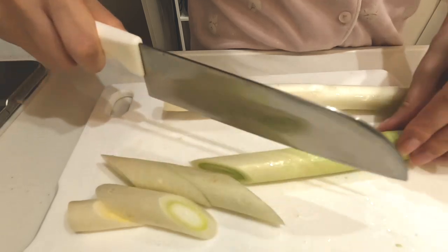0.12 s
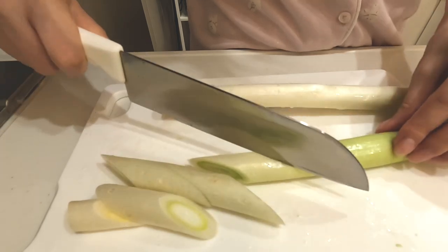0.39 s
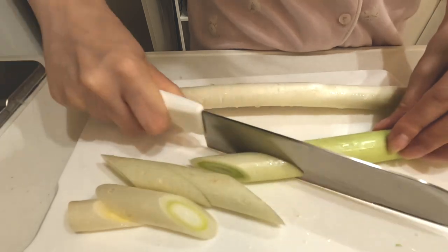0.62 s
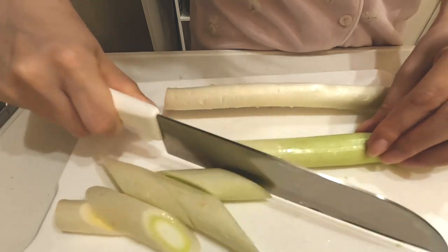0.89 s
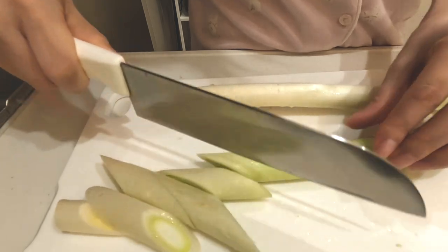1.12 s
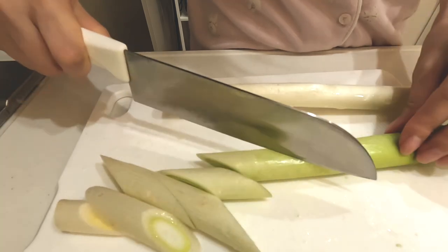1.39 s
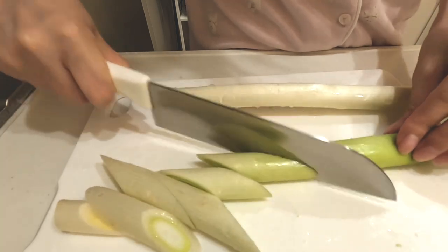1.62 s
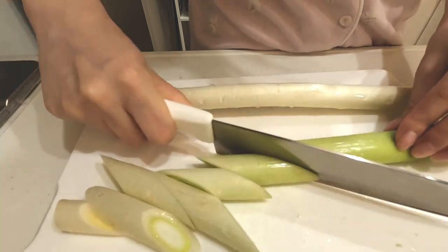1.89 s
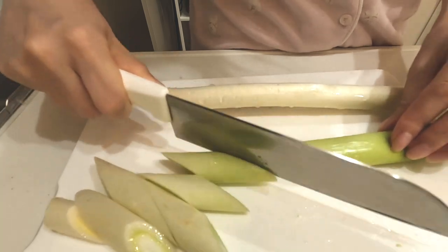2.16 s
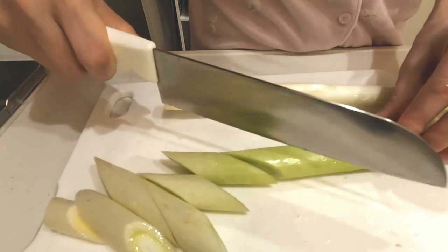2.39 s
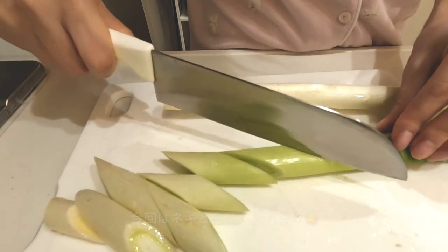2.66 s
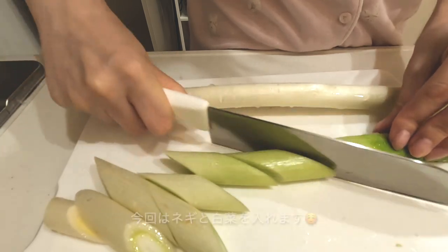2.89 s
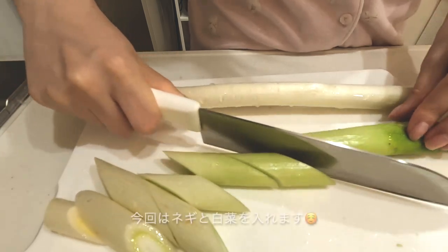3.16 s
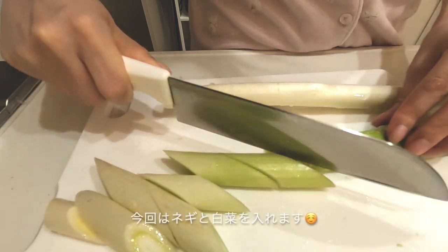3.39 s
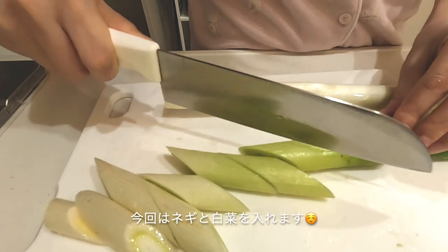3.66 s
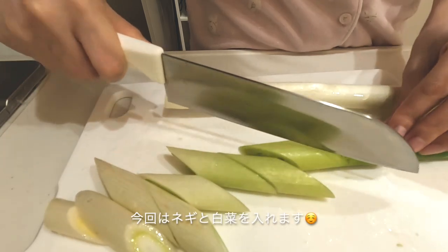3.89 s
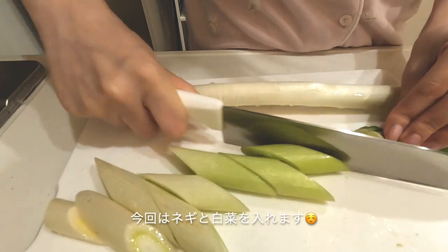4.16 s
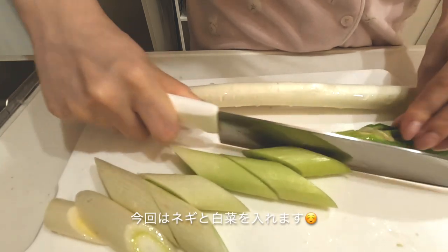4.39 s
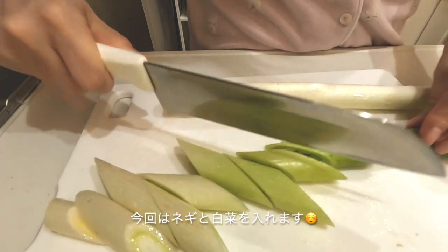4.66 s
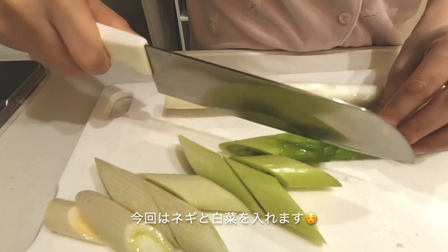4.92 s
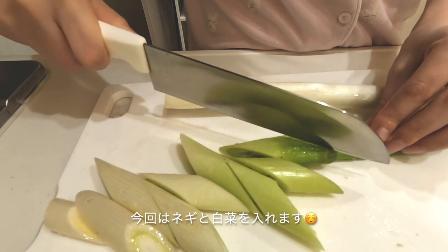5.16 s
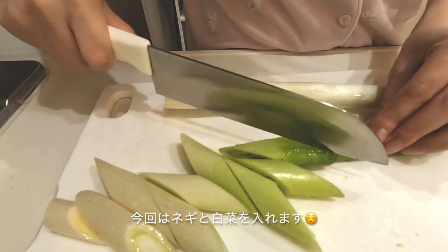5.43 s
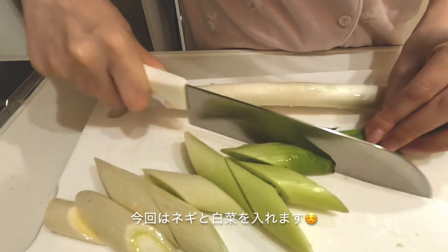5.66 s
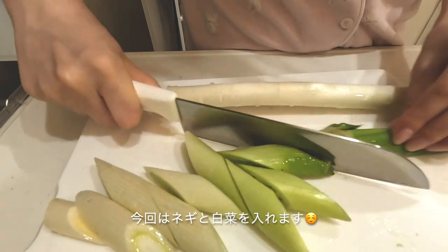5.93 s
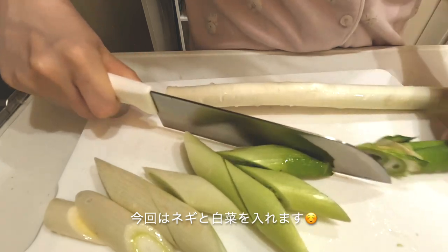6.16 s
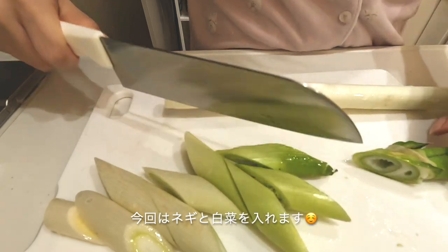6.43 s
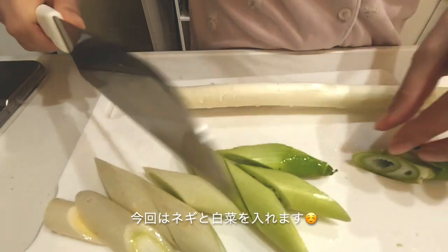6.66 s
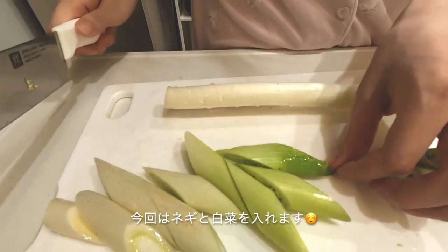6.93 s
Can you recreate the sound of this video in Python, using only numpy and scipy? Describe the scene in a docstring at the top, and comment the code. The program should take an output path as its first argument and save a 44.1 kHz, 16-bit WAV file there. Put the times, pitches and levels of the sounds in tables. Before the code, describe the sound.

In a quiet, lightly reverberant kitchen with faint hum and rumble, a close stereo microphone hears a blade tear juicily through stalks about once a second, five times, each cut landing with a dull plastic knock. Between cuts come edge scrapes, soft rustles of fingers and stalk, low thumps, and brighter crockery clinks from further off, the strongest just before the last cut. Afterwards only small drags, slides and clinks remain, fading away.

```python
"""In a hard kitchen a refrigerator hums (a sine) over faint hiss and rumble (coloured noise). Stalk and fingers slide
(noise and tiny rings), and soft thumps come through the counter (low fading sines). A knife then makes five cuts
through leek stalks close by: the fibres crunch and snap (noise and short rings in jerks), the blade knocks a plastic
board (ringing modes) and is dragged back over it. Between and after the cuts, crockery clinks further off (coloured
reverberation). After the last cut come more slides, drags and clinks, each fading away."""
import sys
import numpy as np
from scipy import signal
from scipy.fft import rfft, irfft, next_fast_len
from scipy.io import wavfile
from scipy.ndimage import uniform_filter1d, map_coordinates

SR = 44100
rng = np.random.default_rng(int(sys.argv[2]) if len(sys.argv) > 2 else 0)


def unload_audio(sound):
    """Save the sound as a 16-bit wav file, at the path given as the first command line argument."""
    columns = np.transpose(np.atleast_2d(sound))
    # keep every value between -1 and 1, then stretch to whole-number steps
    steps = np.round(np.clip(columns, -1, 1) * 32767)
    wavfile.write(sys.argv[1], SR, steps.astype(np.int16))


def ratio_of_db(decibels):
    """Turn decibels (scalar or array-like) into linear amplitude factors; 0 dB maps to 1."""
    return 10 ** (np.asarray(decibels, float) / 20)


N = 310905  # length [samples]

# steady hum of the refrigerator: (frequency [Hz], average level [dB])
HUM = (59.2, -53.5)
# colour of the room hiss: (frequency [Hz], relative level [dB per Hz])
HISS = [(40, -19), (70, 1), (120, -3), (200, -7), (235, -4), (300, -15), (500, -15), (800, -30),
        (1400, -23.5), (3500, -37), (5200, -32.5), (8000, -38.5), (12500, -39.5), (14000, -67)]
HISS_DB = -59  # average level
# low rumble that comes and goes: (time [s], average level [dB])
RUMBLE = [(0.0, -60), (0.08, -52), (2.08, -48), (2.32, -65), (2.73, -51), (2.96, -61.5), (3.04, -47),
          (3.45, -51.5), (3.49, -56.5), (4.18, -43), (4.85, -55.5), (5.32, -47.5), (5.34, -56.5),
          (6.11, -58), (6.38, -44.5), (6.64, -58), (7.01, -57.5), (7.05, -81)]
# colour of the rumble: (frequency [Hz], relative level [dB per Hz])
RUMBLE_COLOUR = [(6, -24.0), (16, 6.0), (36, 3.0), (52, -16.5), (80, -59.5)]
# how long each pitch lingers in the kitchen: (frequency [Hz], time to fall by 60 dB [s])
KITCHEN = [(150, 0.84), (800, 0.41), (2500, 0.38), (6000, 0.39), (12000, 0.31)]
# likeness of left and right: (frequency [Hz], correlation [0 to 1])
ALIKE = [(30, 0.96), (70, 0.87), (125, 0.79), (300, 0.87), (1000, 0.69), (4000, 0.69), (9000, 0.83),
         (12500, 0.45)]

# stalk and fingers slide:
# (peak time [s], rise [s], fall [s], level [dB], rustle centre [Hz], left over right [dB])
SLIDES = [(0.11, 0.074, 0.12, -57.5, 3680, -3.5), (0.78, .08, 0.078, -68, 4140, 2),
          (1.071, 0.083, 0.096, -53.5, 4800, 2), (2.259, 0.12, 0.11, -57, 5100, -3),
          (2.64, 0.061, 0.089, -58.5, 5500, 5.5), (3.19, 0.24, 0.14, -53.5, 4500, -5),
          (3.461, .06, 0.13, -52, 3880, -2), (3.551, 0.068, 0.024, -49.5, 3590, -4),
          (3.7, 0.23, 0.45, -69.5, 3450, 11), (4.37, .05, .06, -79.5, 4930, -10),
          (4.471, 0.065, .12, -49.5, 3550, -4), (4.83, 0.11, 0.096, -48.5, 3800, -3),
          (5.09, 0.11, 0.099, -53, 3630, 3.5), (5.9, .05, 0.078, -59, 3710, -1),
          (6.08, 0.068, 0.1, -53, 3840, 0), (6.2, .06, 0.21, -54, 4300, -5)]
# the edge drags over the board:
# (peak time [s], rise [s], fall [s], level [dB], scrape centre [Hz], relative singing of the steel [dB])
DRAGS = [(0.45, 0.037, 0.03, -46.5, 915, -23), (0.886, 0.046, .045, -34, 1296, 0),
         (2.057, 0.027, 0.053, -37, 1360, 0), (3.26, 0.13, 0.054, -48.5, 1190, -3.5),
         (4.471, 0.072, 0.1, -50.5, 2030, -6), (4.59, 0.12, 0.032, -41.5, 2340, -6),
         (5.973, 0.03, 0.13, -45.5, 1480, -10), (6.21, 0.061, 0.12, -51.5, 1480, -14),
         (6.36, 0.18, 0.058, -54.5, 1620, -16), (6.97, 0.024, 0.092, -58.5, 880, -20)]
# colours of the rustle and the scrape: (frequency [Hz], relative level [dB per Hz])
RUSTLE = [(1290, -32), (2200, -4.5), (3900, -3), (4650, -14.5), (5110, -0.5), (9000, -15), (11700, -56.5),
          (19800, -120)]
SCRAPE = [(210, -24), (350, 2.5), (530, -9.5), (817, 0), (1720, -1), (2270, 5), (3500, -10.5), (4550, -35),
          (7700, -120)]
# wet spray of the cells, also the hiss of rubbing: (frequency [Hz], relative level [dB per Hz])
FIZZ = [(4710, -7.5), (8000, -8), (9160, -11.5), (11200, -5), (12900, -14), (13700, -18), (15500, -56.5)]
# resonances of the steel blade: (frequency [Hz], width [Hz], relative level [dB])
BLADE = [(900, 110, -2), (1280, 75, -10), (2380, 110, 5), (3150, 78, -3), (3840, 100, -8), (4940, 48, 13),
         (5350, 40, 3), (6050, 45, -1), (7050, 50, -8), (10050, 76, -25)]
# mixing levels against the drag level; rustle and hiss also follow the singing, so dull drags have less
DRAG_RUSTLE_DB, DRAG_HISS_DB = -4.5, -11.5
DRAG_RUSTLE_HZ, DRAG_PAN_DB = 4800, -2.2  # centre of the rustle grains; left over right
SLIDE_SCRAPE_DB, SLIDE_HISS_DB, SLIDE_RING_DB = -7, -19.5, -11.5  # mixing levels against the slide level
SLIDE_SCRAPE_HZ = 1550  # centre of the scrape grains
SWELL_DB = 15  # a swell is this far below its peak after one rise or fall time

# soft thumps through the counter: (time [s], level [dB], pitch [Hz], time to fall by 60 dB [s])
THUMPS = [(0.129, -42, 131.4, 0.65), (1.424, -29.5, 113.2, 0.2), (2.049, -35.5, 178, 0.19),
          (2.597, -38.5, 80.6, 0.31), (3.051, -36.5, 76, 0.6), (3.256, -34, 227, 0.2),
          (3.811, -38, 76, 0.084), (4.021, -32.5, 91.8, 0.3), (4.142, -24.5, 186.7, 0.48),
          (4.329, -31, 100.7, 0.29), (5.186, -21, 94.8, 0.12), (5.221, -27.5, 108.6, 0.17),
          (5.247, -37, 83.3, 1), (5.329, -27.5, 77.2, 0.14), (5.478, -32, 90.7, 0.5),
          (5.953, -42.5, 218, 0.38), (6.297, -55, 71, 0.61), (6.962, -45.5, 251, 0.27)]

# how hard the blade tears through the stalk, one list a cut: (time [s], crunch level [dB])
CUTS = [
    [(0.45, -63.5), (0.484, -32.5), (0.494, -39), (0.504, -29), (0.562, -23), (0.598, -24), (0.604, -29),
     (0.74, -53.5), (0.78, -79)],
    [(1.565, -56), (1.591, -35.5), (1.619, -39), (1.629, -25), (1.637, -35), (1.717, -18.5), (1.843, -55.5),
     (1.869, -43.5), (1.95, -89.5)],
    [(2.75, -52.5), (2.764, -36.5), (2.838, -23), (2.858, -23), (2.884, -23), (2.9, -26.5), (2.964, -36),
     (2.968, -42.5), (2.992, -48)],
    [(3.97, -50.5), (4.002, -32.5), (4.02, -40.5), (4.03, -31.5), (4.158, -20.5), (4.208, -37),
     (4.218, -31), (4.236, -52.5), (4.268, -37)],
    [(5.6, -32), (5.624, -39), (5.642, -32.5), (5.652, -41.5), (5.666, -26), (5.72, -19.5), (5.73, -36),
     (5.814, -30.5), (5.9, -57.5)],
]
# picked snaps and ticks, most of them fibres breaking in the cuts: (time [s], level [dB], pitch [Hz])
SNAPS = [(0.4794, -28.5, 1890), (0.5043, -24, 4000), (0.5153, -23, 3550), (0.535, -16.5, 3170),
         (0.5526, -16.5, 4100), (0.565, -13.5, 1990), (0.6454, -20.5, 1840), (1.5842, -29, 3540),
         (1.5951, -22.5, 2700), (1.6094, -27.5, 2860), (1.6307, -20, 2830), (1.6531, -14.5, 2190),
         (1.6931, -25.5, 1800), (1.7172, -17.5, 1900), (1.743, -14, 1830), (1.7957, -19.5, 1990),
         (2.7663, -22, 3180), (2.7754, -18.5, 3630), (2.79, -27, 1660), (2.8194, -10.5, 3200),
         (2.8391, -12.5, 3300), (2.8672, -19, 2720), (2.882, -12.5, 3470), (2.9697, -16, 3330),
         (3.5485, -34, 1520), (3.9944, -27.5, 1750), (4.03, -20.5, 3800), (4.0468, -19.5, 3660),
         (4.0584, -15, 3770), (4.0983, -26, 3150), (4.1112, -15, 3940), (4.1402, -10.5, 3880),
         (4.153, -14.5, 1970), (4.2186, -15.5, 7500), (4.732, -44.5, 2960), (5.6334, -22.5, 2550),
         (5.6408, -15, 2950), (5.667, -13, 3640), (5.6834, -14.5, 3060), (5.7075, -15.5, 2830),
         (5.764, -25.5, 3740), (5.9234, -25.5, 3140), (5.9397, -25, 4000), (5.9603, -15.5, 2980)]
# the stalk met by each cut: (pitch of bursting cells before the edge lands [Hz], relative fizz level [dB])
STALKS = [(2950, -12.5), (2530, -14), (3090, -14.5), (3030, -15.5), (2660, -14.5)]
# colour of the crunch: (frequency [Hz], relative level [dB per Hz])
CRUNCH = [(290, -14.5), (500, -4.5), (1350, -1.5), (1910, 5), (2190, -10), (3810, 3.5), (7420, -6.5),
          (9000, -40.5), (11700, -55.5), (19800, -120)]
CRUSHED_PITCH = 0.76  # share of the cell pitch left once the edge has landed
FIZZ_GROWS = 0.79  # dB of fizz for each dB of crunch
SMALL_SNAP_DB, SNAP_SCATTER_DB = 4, 2.8  # chance snaps over the crunch level; left-right scatter of all snaps

# the edge lands on the board: (time [s], level [dB], extra for the low modes [dB],
# shaking of the first board mode [dB], shaking of the second board mode [dB])
KNOCKS = [(0.596, -12.5, 0, -31.5, -35), (1.75, -16, -2.5, -31, -31), (2.888, -13, 0, -36.5, -29.5),
          (4.18, -7.5, -6.5, -34, -34), (5.72, -10, -5, -35, -31.5)]
# resonances of the plastic board: (frequency [Hz], width [Hz], relative level [dB])
BOARD = [(228.9, 30.6, 4), (322.1, 21, -5), (401, 28, 10), (635, 34, -13), (842, 84, 1), (1150, 130, -7.5)]
# side from which stalk and board are heard: (frequency [Hz], left over right [dB])
FACING = [(60, 4), (150, -2.5), (380, -1.5), (950, -1), (2380, -3.5), (5980, -2), (15000, 2)]
# shaking around each landing: (peak after the landing [s], rise [s], fall [s])
FIRST_SHAKE, SECOND_SHAKE = (-0.028, 0.031, 0.11), (0.005, 0.053, 0.092)
COUNTER_SHAKE, COUNTER_DB = (-0.024, 0.056, 0.15), -41
# colour of the shaking counter: (frequency [Hz], relative level [dB per Hz])
COUNTER_COLOUR = [(35, -32.5), (65, 6.5), (160, 5.5), (230, -40.0)]

# far contacts: (time [s], level [dB], relative ringing [dB], left over right [dB], what is struck)
CLINKS = [(1.3169, -18, -9.5, 2.5, "plate"), (1.4101, -25.5, -6, 3, "plate"), (2.5794, -54, -3, 6, "spoon"),
          (3.004, -18, -3.5, 3.6, "lid"), (3.0234, -29, -13, -3, "lid"), (3.7789, -34, -9.5, 2.1, "plate"),
          (3.916, -23, -5.5, 3, "lid"), (4.2745, -19, -8, 3.5, "lid"), (5.172, -25.5, -10.2, 6, "tray"),
          (5.189, -24.5, -2, 1.5, "tray"), (5.3182, -15, 0, 3, "cup"), (5.462, -8.5, -10, 2.5, "bowl"),
          (6.133, -33.5, -5, 5, "lid"), (6.319, -35.5, -12.5, 5.5, "lid"),
          (6.5983, -22.5, 0.5, 2.5, "spoon"), (6.6187, -25, 2, 3, "spoon")]
# colour of the bare contact: (frequency [Hz], relative level [dB])
CLICK = [(200, -24.5), (900, -17.5), (3000, -18), (7000, -20.5), (9000, -31.5), (12500, -30.5),
         (15800, -47)]
# what each far thing rings with: (frequency [Hz], width before widening [Hz], relative level [dB])
PLATE = [(1560, 21, -5), (2190, 11, 3), (2830, 49, 2.5), (4550, 42, 1.5), (4700, 47, 3.5), (5005, 60, -3.5),
         (5500, 25, -1.5), (5830, 44, -9), (6560, 45, -3), (6490, 41, -6), (6900, 27, -22), (7340, 65, -5),
         (8650, 52, -31), (9300, 41, -18)]
BOWL = [(1360, 230, -2), (2010, 20, 5.5), (2774, 52, 9.5), (3870, 74, -7), (4730, 140, 2.5),
        (5470, 420, 1.5), (6570, 440, 2), (6860, 40, -29), (7780, 32, -2), (8300, 140, -21),
        (9570, 67, -12.5)]
CUP = [(1625, 8.1, -1.5), (3150, 57, -8), (3700, 60, 3.5), (3770, 83, 1), (4960, 36, -9.5),
       (5100, 44, -1.5), (6200, 170, -5), (6470, 26, -12.5), (6940, 60, -3.5), (7850, 39, -21),
       (9540, 47, -16), (10700, 35, -20)]
SPOON = [(945, 75, -4), (2300, 120, 1.5), (3030, 110, 2), (3240, 74, -0.5), (3770, 100, 4), (4680, 87, 5.5),
         (5340, 210, 6), (6820, 180, 2.5), (6940, 49, -1.5), (7850, 140, 0), (9240, 84, -10.5),
         (11570, 1900, -13.5)]
TRAY = [(1103, 110, 5), (1685, 55, 8), (1890, 22, 0), (2110, 42, 6), (2630, 42, -7), (4610, 44, -0.5),
        (4920, 140, -5), (5440, 49, -10.5)]
LID = [(2450, 110, -8.5), (2887, 36, 1), (3170, 55, -3.5), (3850, 170, -6.5), (4800, 97, 1.5),
       (5300, 260, 0.5), (5800, 30, -20.5), (5870, 320, -3.5), (6910, 120, -12.5), (7340, 25, -4),
       (8900, 15, -19.5), (9400, 57, -24.5)]


def unit(x):
    """Scales to rms 1."""
    return x / np.sqrt(np.mean(x ** 2) + 1e-20)


def along(points, hz):
    """Reads (frequency, value) points on a log frequency axis."""
    f, v = np.transpose(points)
    return np.interp(np.log(hz + 1), np.log(f + 1), v)


def curves(tables):
    """A gate that fades in and out at the ends of each table, then the columns per sample."""
    t = np.arange(N) / SR
    s, *cols = np.transpose(np.vstack(tables))
    gate = sum((t >= rows[0][0]) & (t <= rows[-1][0]) for rows in tables) > 0
    return [uniform_filter1d(gate * 1., size=600)] + [np.interp(t, s, c) for c in cols]


def wobble(rate):
    """A smooth random curve with rate knots a second."""
    knots = rng.standard_normal(int(N * rate / SR) + 4)
    return map_coordinates(knots, [np.arange(N) * rate / SR])


def filtered(x, response):
    """Applies a complex response of frequency to x."""
    n = x.shape[-1]
    m = next_fast_len(n + 8192)
    return irfft(rfft(x, m) * response(np.fft.rfftfreq(m, 1 / SR)), m)[..., :n]


def modes(table):
    """Response of a body that rings at several (frequency, width, level) resonances when struck."""
    def response(f):
        total = 0
        for k, (c, w, db) in enumerate(table):
            resonance = 1j * f * w / (c * c - f * f + 1j * f * w)
            total = total + (-1) ** k * ratio_of_db(db) * resonance  # signs alternate
        return total
    return response


def sides(db):
    """Left and right gains for a left-right level difference."""
    return ratio_of_db(np.array([db / 2, -db / 2]))


def pair(mid, side):
    """Left and right from two unrelated signals, as alike at each frequency as ALIKE says."""
    turn = lambda hz: np.arccos(np.clip(along(ALIKE, hz), -1, 1)) / 2
    shares = lambda hz: np.array([np.cos(turn(hz)), np.sin(turn(hz))])
    a, b = filtered(np.array([mid, side]), shares)
    return np.array([a + b, a - b])


def grit(spiky_db, lumpy_db, rate):
    """White grains of uneven size that come in lumps."""
    spikes = np.minimum(rng.exponential(size=N), 5)
    sizes = ratio_of_db(spiky_db * spikes + lumpy_db * wobble(rate))
    return unit(sizes) * rng.standard_normal((2, N))


def coloured(x, spectrum):
    """Stereo noise of rms 1 shaped by that spectrum."""
    return unit(filtered(pair(*x), lambda hz: ratio_of_db(along(spectrum, hz))))


def patchy(x, depth_db):
    """Random coloured patches, some hundred hertz wide and tens of milliseconds long."""
    z = signal.stft(x, nperseg=256)[2]
    field = uniform_filter1d(rng.standard_normal(z.shape[1:]), size=3, axis=0)
    field = uniform_filter1d(field, size=16, axis=1)
    return unit(signal.istft(z * ratio_of_db(depth_db * unit(field)), nperseg=256)[1][:, :N])


def grains(gate, centre_hz, spread, cycles, spiky_db, count):
    """Short damped rings at random moments, pitched around a moving centre; rms 1 while the gate is open."""
    draw = rng.random((count, 3))
    start = np.flatnonzero(gate > 0)[(draw[:, 0] * np.sum(gate > 0)).astype(int)]
    hz = centre_hz[start] * np.exp(spread * rng.standard_normal(count))
    turns = np.clip(hz, 500, 9000)[:, None] * np.arange(300) / SR
    sizes = ratio_of_db(-spiky_db * np.log(draw[:, 1:2] + 0.0076))
    rings = sizes * np.sin(2 * np.pi * turns) * np.exp(-turns / cycles)
    places = start[:, None] + np.arange(300)
    out = np.bincount(places.ravel(), rings.ravel(), N + 300)[:N]
    return out / np.std(out[gate > 0])


def swells(s, rise, fall, db, bend):
    """One level in dB per event and sample: up to a peak at s and down again."""
    column = lambda values: np.reshape(values, (-1, 1))
    lag = np.arange(N) / SR - column(s)
    span = np.abs(lag) / np.where(lag < 0, column(rise), column(fall)).clip(0.005)
    return column(db) - SWELL_DB * np.minimum(span, 9) ** bend


def tail(seconds):
    """A new stereo reverberation, energy 1 on the left; each frequency dies at its own speed."""
    hz, t, z = signal.stft(rng.standard_normal((2, int(seconds * SR))), SR, nperseg=256)
    fade = ratio_of_db(-60 * t / along(KITCHEN, hz)[:, None])
    out = pair(*signal.istft(z * fade, SR, nperseg=256)[1])
    return out / np.linalg.norm(out[0])


def add(track, s, sound):
    """Mixes a stereo sound in at time s."""
    part = track[:, round(s * SR):][:, :sound.shape[1]]
    part += sound[:, :part.shape[1]]


def room():
    """Steady room noise: gently wavering hiss, a slightly unsteady hum and a low rumble that comes and goes."""
    hz, db = HUM
    hum_level = np.sqrt(2) * ratio_of_db(db + 1.0 * wobble(2.6))  # root 2 turns rms into sine peak
    hum = hum_level * np.sin(2 * np.pi * hz * np.arange(N) / SR + 0.18 * wobble(4))
    hiss = ratio_of_db(HISS_DB + 0.73 * wobble(5.1)) * coloured(rng.standard_normal((2, N)), HISS)
    _, rumble_db = curves([RUMBLE])
    rumble = ratio_of_db(rumble_db + 2.5 * wobble(10)) * coloured(rng.standard_normal((2, N)), RUMBLE_COLOUR)
    return hum + hiss + rumble


def rubs():
    """Sliding makes rough noise and tiny rings pitched by the contact, and sets the steel singing."""
    *drag, drag_hz, sing_db = np.transpose(DRAGS)
    *slide, slide_hz, slide_pan_db = np.transpose(SLIDES)
    drags, slides = swells(*drag, bend=2.25), swells(*slide, bend=2.2)
    which_drag, which_slide = drags.argmax(axis=0), slides.argmax(axis=0)
    drag_db, slide_db = drags.max(axis=0), slides.max(axis=0)
    sing_now_db = sing_db[which_drag]

    # the louder of drag and slide sets pitch and side
    dragging, always = drag_db > slide_db, np.ones(N)
    high_hz = np.where(dragging, DRAG_RUSTLE_HZ, slide_hz[which_slide])
    low_hz = np.where(dragging, drag_hz[which_drag], SLIDE_SCRAPE_HZ)
    pan_db = uniform_filter1d(np.where(dragging, DRAG_PAN_DB, slide_pan_db[which_slide]), size=900)

    def mix(over_drag_db, over_slide_db):
        """Gain for drag and slide together, their powers added."""
        return np.hypot(ratio_of_db(drag_db + over_drag_db), ratio_of_db(slide_db + over_slide_db))

    rustle = ratio_of_db(-7) * coloured(patchy(grit(1.4, 1.3, rate=66), depth_db=3), RUSTLE)
    rustle += ratio_of_db(-7.5) * grains(always, high_hz, spread=0.14, cycles=4, spiky_db=5.0, count=13000)
    hiss = coloured(patchy(grit(1.2, 1.4, rate=160), depth_db=7.5), FIZZ)
    scrape = ratio_of_db(-6.5) * coloured(patchy(grit(0.76, 0.83, rate=46), depth_db=4.0), SCRAPE)
    scrape += ratio_of_db(-3.5) * grains(always, low_hz, spread=0.08, cycles=0.5, spiky_db=3.5, count=8000)
    push = pair(*grit(2.8, 0.94, rate=21))
    push /= np.std(filtered(push, modes(BLADE)))
    # levels come before the resonances, so the steel rings on after the contact
    ring = filtered(ratio_of_db(-2.5) * mix(sing_now_db, SLIDE_RING_DB) * push, modes(BLADE))

    out = mix(DRAG_RUSTLE_DB + 0.9 * sing_now_db, 0) * rustle
    out = out + mix(DRAG_HISS_DB + 0.6 * sing_now_db, SLIDE_HISS_DB) * hiss
    out = out + mix(0, SLIDE_SCRAPE_DB) * scrape
    return sides(pan_db) * (out + ring)


def thumps():
    """The counter gives low wavering rings with a soft start that fade steadily."""
    out, t = np.zeros((2, N)), np.arange(SR // 2) / SR
    for s, db, hz, t60 in THUMPS:
        shared_drift = np.cumsum(rng.normal(0, 0.056, len(t)))
        own_drift = np.cumsum(rng.normal(0, 0.008, (2, len(t))), axis=1)  # one for each ear
        fade = ratio_of_db(db - 1.0 - 60 * t / np.clip(t60, 0.03, 1))
        soft_start = 1 - np.exp(-t / 0.0041)
        add(out, s, np.sin(2 * np.pi * hz * t + shared_drift + own_drift) * fade * soft_start)
    return out


def jerks(gate, snap_size, chance_db, t60, base, count):
    """Envelope of a blade that sticks and slips: bursts at the snaps and at chance moments, over a base."""
    start = np.flatnonzero(gate > 0)[(rng.random(count) * np.sum(gate > 0)).astype(int)]
    kicks = np.bincount(start, ratio_of_db(chance_db + 2.5 * rng.standard_normal(count)), N)
    kicks[[round(row[0] * SR) for row in SNAPS]] += snap_size
    out = base + signal.fftconvolve(kicks, ratio_of_db(-60 * np.arange(2000) / SR / t60))[:N]
    return out / np.sqrt(np.mean(out[gate > 0] ** 2))


def stalk():
    """Fibres tear in jerks: crackle, small cells that ring as they burst, a wet fizz, and single snaps."""
    gate, crunch_db = curves(CUTS)
    below_peak_db = crunch_db - crunch_db.max()
    landed = np.transpose(KNOCKS)[0]
    lag = np.arange(N) / SR - landed[:, None]
    cut = np.argmin(np.abs(lag), axis=0)  # the cut whose landing is nearest
    cell_hz, wet_db = np.array(STALKS)[cut].T
    centre_hz = cell_hz * np.where(lag[cut, np.arange(N)] > 0, CRUSHED_PITCH, 1)
    fizz_db = wet_db + crunch_db.max() + FIZZ_GROWS * below_peak_db

    crackle = ratio_of_db(crunch_db - 5) * coloured(patchy(grit(2.2, 0.68, rate=140), depth_db=2.5), CRUNCH)
    cells = grains(gate, centre_hz, spread=0.287, cycles=3.6, spiky_db=-0.5, count=1500)
    cells = ratio_of_db(crunch_db - 6.5) * cells
    fizz = ratio_of_db(fizz_db - 0.5) * coloured(grit(1.5, 0.54, rate=63), FIZZ)

    # forty chance snaps join the listed ones
    at = rng.choice(np.flatnonzero(gate > 0), size=40)
    small_hz = centre_hz[at] * rng.uniform(0.27, 1.6, len(at))
    small = np.transpose([at / SR, crunch_db[at] + SMALL_SNAP_DB, small_hz])
    snaps, t = np.zeros((2, N)), np.arange(400) / SR
    for s, db, hz in np.vstack([SNAPS, small]):
        ring = np.sin(2 * np.pi * hz * t) * ratio_of_db(-60 * t / 0.007)
        crack = 0.44 * rng.standard_normal(len(t)) * ratio_of_db(-60 * t / 0.018)
        side_gains = sides(SNAP_SCATTER_DB * rng.standard_normal())[:, None]
        add(snaps, s, ratio_of_db(db) * side_gains * (ring + crack))
    dull = lambda hz: 1 / (1 + (hz / 13000) ** 16) / (1 + 1j * hz / 9000)  # softens the treble

    base = 0.3 + 0.83 * ratio_of_db(0.43 * below_peak_db)  # steadier when the tearing is hard
    jerky = jerks(gate, snap_size=0.71, chance_db=-7.5, t60=0.027, base=base, count=350)
    return gate * jerky * (crackle + cells + fizz) + filtered(snaps, dull)


def board():
    """The push of each cut shakes two board modes and the counter; the landing edge rings all modes."""
    landed, _, _, first_db, second_db = np.transpose(KNOCKS)

    def shake(shape, db):
        """Gain that swells around each landing."""
        after, rise, fall = shape
        return ratio_of_db(swells(landed + after, rise, fall, db, bend=1.24).max(axis=0))

    shaken = []
    for mode in BOARD[:2]:
        narrow = lambda hz: modes([mode])(hz) ** 2
        shaken.append(unit(filtered(rng.standard_normal(N), narrow)))
    counter = coloured(rng.standard_normal((2, N)), COUNTER_COLOUR)
    push = shake(FIRST_SHAKE, first_db) * shaken[0] + shake(SECOND_SHAKE, second_db) * shaken[1]
    push = push + shake(COUNTER_SHAKE, COUNTER_DB) * counter

    blows = np.zeros((2, N))  # one row for the low modes, one for the high
    for s, db, low_db, *_ in KNOCKS:
        strengths = ratio_of_db([[db + low_db + 8.5], [db + 16.0]])
        blows[:, round(s * SR):][:, :16] = strengths * np.hanning(16)  # a third of a millisecond
    return push + filtered(blows[0], modes(BOARD[:3])) + filtered(blows[1], modes(BOARD[3:]))


def crockery():
    """Short far contacts, heard as kitchen reverberation coloured by the click and the ringing."""
    out = np.zeros((2, N))
    things = dict(plate=PLATE, bowl=BOWL, cup=CUP, spoon=SPOON, tray=TRAY, lid=LID)
    for s, db, ring_db, pan_db, thing in CLINKS:
        # every mode is widened, so the rings die sooner
        widened = [(hz, width + 30, level_db) for hz, width, level_db in things[thing]]
        # many weak modes at chance pitches make the reverberant click denser and uneven
        chance_hz, chance_size = rng.uniform(700, 14000, size=50), rng.standard_normal(size=50)
        chance_modes = [(hz, 110, 3 * z - 1.5) for hz, z in zip(chance_hz, chance_size)]
        ringing = lambda hz: ratio_of_db(ring_db) * modes(widened)(hz)
        click = lambda hz: ratio_of_db(along(CLICK, hz)) * (0.62 + modes(chance_modes)(hz))
        sound = filtered(tail(0.96), lambda hz: ringing(hz) + click(hz))
        sound = sound / np.std(sound[:, :900])  # levelled by its first moments
        add(out, s, ratio_of_db(db - 14.0) * sides(pan_db)[:, None] * sound)
    return out


def scene():
    """Near work with a little of the kitchen's answer, over the far sounds."""
    near = filtered(stalk() + board(), lambda hz: sides(along(FACING, hz))) + rubs()
    echo = signal.fftconvolve(near.mean(axis=0)[None], tail(0.63), axes=1)[:, :N]
    return near + ratio_of_db(-11.0) * echo + crockery() + thumps() + room()


def roll_off(x):
    """The treble ends steeply here."""
    return signal.sosfilt(signal.butter(12, 16460, fs=SR, output="sos"), x)


def record(dry):
    """Turns the finished mix into the sound that is written out."""
    return roll_off(dry)


dry = scene()
out = record(dry)
unload_audio(out)
```